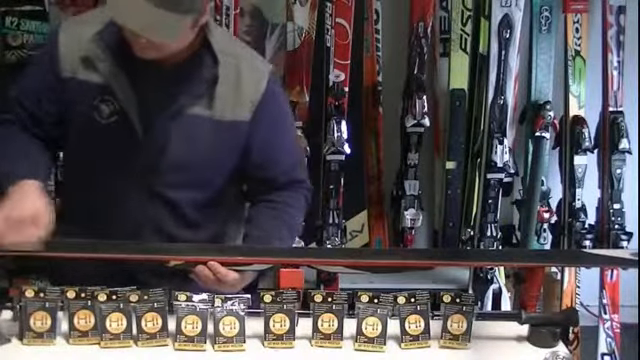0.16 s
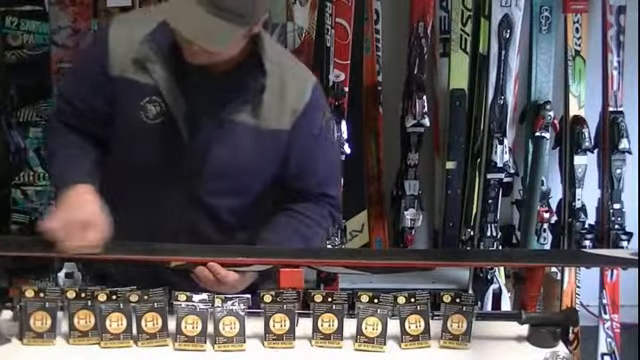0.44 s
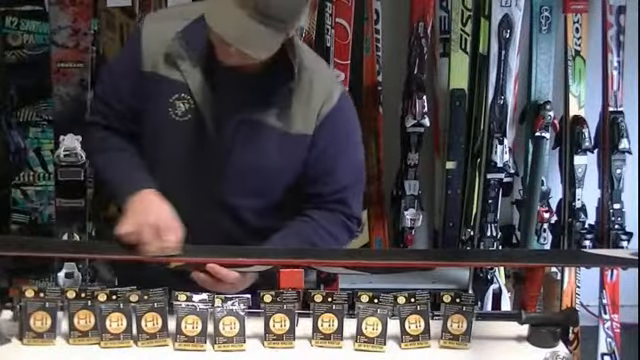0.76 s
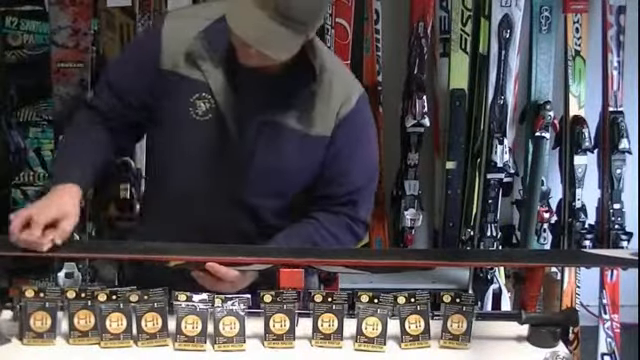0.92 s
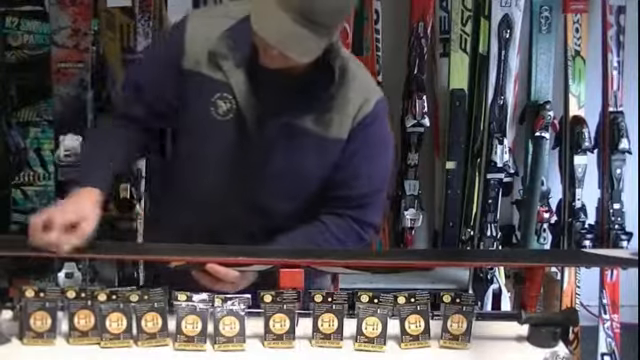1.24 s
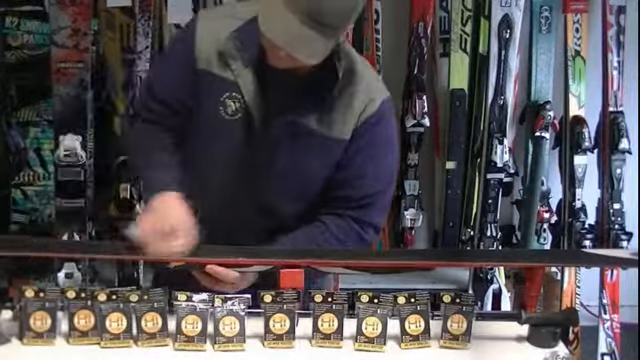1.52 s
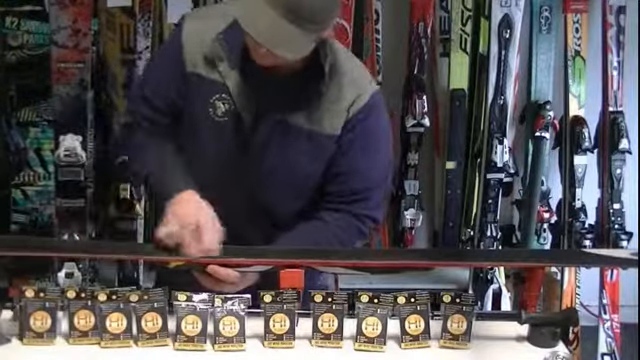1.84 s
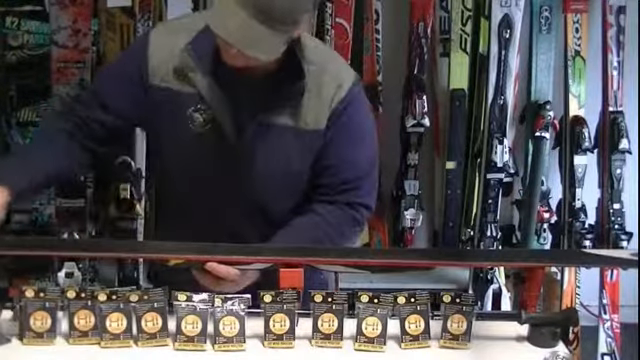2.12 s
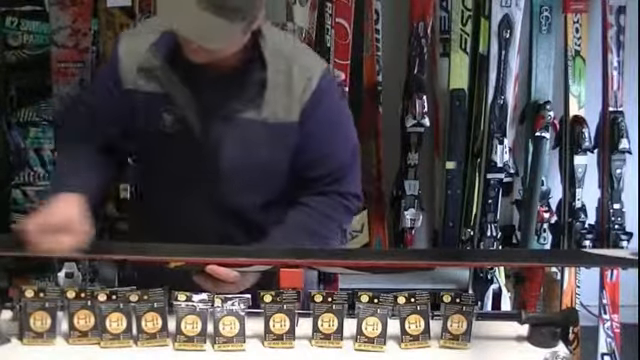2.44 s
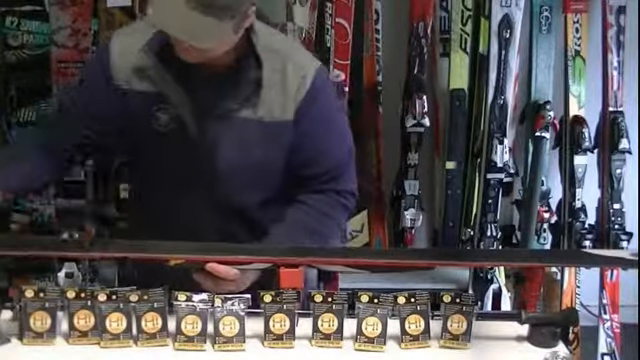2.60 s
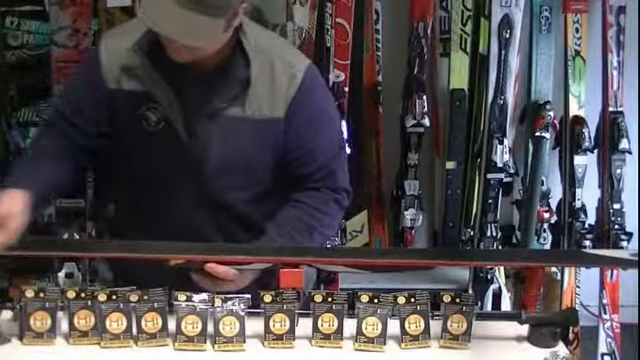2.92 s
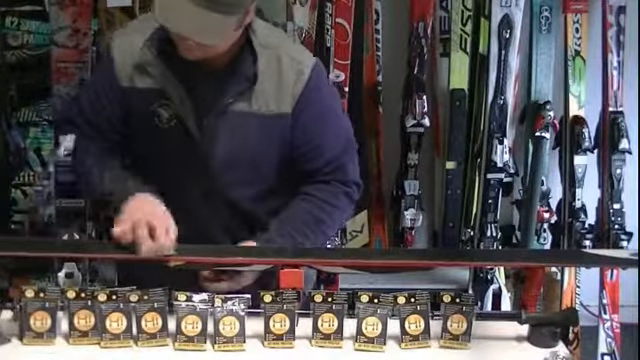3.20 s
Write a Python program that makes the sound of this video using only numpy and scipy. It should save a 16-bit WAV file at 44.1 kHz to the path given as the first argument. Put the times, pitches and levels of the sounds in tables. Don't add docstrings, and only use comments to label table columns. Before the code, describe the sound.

Wax block rubbed briskly back and forth along a ski base, hissing dry strokes in a small workshop

```python
import sys
import numpy as np
from scipy import signal
from scipy.fft import rfft, irfft, next_fast_len
from scipy.io import wavfile
from scipy.ndimage import uniform_filter1d

SR = 44100
rng = np.random.default_rng(int(sys.argv[2]) if len(sys.argv) > 2 else 0)


def file_out(sig):
    cols = np.atleast_2d(sig).T
    lim = np.clip(cols, -1, 1)
    pcm = np.round(lim * 32767).astype(np.int16)
    wavfile.write(sys.argv[1], SR, pcm)


def boost_factor(decibels):
    exponent = np.asarray(decibels, float) / 20
    return 10 ** exponent


N = 148176

# (frequency [Hz], level [dB])
HUM = [(25, -2), (55, -3.5), (110, -0.5), (160, 1), (235, 9.5), (260, 6.5), (315, 14.5), (420, 11)]
# (frequency [Hz], likeness [0-1])
HUM_SAME = [(25, .02), (60, .2), (125, 0.33), (250, 0.97), (500, 0.75)]
# (frequency [Hz], t60 [s])
ROOM_DECAY = [(300, 0.21), (1500, 0.18), (4000, .3), (8000, 0.18), (12000, 0.22)]
# (frequency [Hz], level [dB])
ROOM_SIDE = [(300, -18), (700, -14.5), (1500, -13), (3000, -9), (6000, -6.5), (12000, -8.5)]
# (frequency [Hz], left minus right [dB])
LEAN = [(60, 5), (110, -5), (190, 0), (350, -0.5), (630, -0.5), (1140, 0.0), (2060, 0.5), (3710, 0.5),
        (6690, 1.5), (12100, 0.5)]
# (starting turn [s], hiss level [dB], slope over the stroke [dB], speed-up [s], slow-down [s])
STROKES = [(-.12, -38.5, -13, .02, 0.032), (0.047, -43.5, 1, 0.02, 0.016),
           (0.223, -45.5, -3.5, 0.025, 0.017), (0.39, -43, -5, 0.025, 0.022), (0.576, -46, 5, 0.014, 0.023),
           (0.741, -45, -3.5, 0.023, 0.018), (.937, -47, -0.5, 0.024, 0.025),
           (1.103, -46.5, -0.5, 0.017, .02), (1.284, -46, 3.5, 0.018, 0.017),
           (1.455, -44.5, -1, 0.016, 0.018), (1.631, -46.5, 5, 0.019, 0.021),
           (1.804, -46, -1.5, 0.015, 0.028), (1.994, -44.5, 5.5, 0.029, 0.053),
           (2.335, -44, 0, 0.04, 0.029), (2.558, -50.5, -5, 0.01, 0.0018),
           (2.586, -44.5, 7.5, 0.0044, 0.037), (2.753, -44.5, -2, 0.027, .01),
           (2.953, -52, 6, 0.017, 0.0034), (2.995, -45, 8, 0.0038, 0.035), (3.154, -44, -5, 0.04, 0.053)]
# (ring level [dB], ring slope over the stroke [dB], low modes [dB], treble [dB])
GRIPS = [(-57, -15, -1, -1.5), (-54, -1, 0.5, -3), (-57.5, -2, 1, 1.6), (-54, -3, 2.2, -0.4),
         (-61.5, -7, 5.8, 2.4), (-51.5, -2.5, -1.3, 1.5), (-60, -8, 5, 5.5), (-52.5, 1, 1, 3.5),
         (-57, -4, -1, 1), (-52.5, -2.5, 0, -1.4), (-59, -6, 3.5, 1.3), (-54, -2, 1, -1),
         (-56, -6.5, -1, .1), (-52, 4, -3.5, -0.5), (-59, -3, 9, 6), (-55, -6, -3.5, 4.3),
         (-51.5, 0, -1.2, 2.4), (-55, 8, -0.5, 5), (-56, -5, 1.5, 4.7), (-54, -2, 1.5, 2.2)]
# (time [s], length [s], frequency [Hz], level [dB])
GRABS = [(0.42, 0.027, 1780, -46.5), (0.56, 0.022, 2100, -57), (0.77, 0.016, 2280, -49.5),
         (0.8, 0.033, 1900, -54), (0.94, 0.05, 2550, -58), (1.17, 0.1, 2440, -52),
         (1.62, 0.084, 840, -64.5), (1.88, 0.076, 800, -61.5), (2.19, 0.033, 1880, -51.5),
         (2.5, 0.031, 1650, -67), (2.6, 0.028, 3240, -58), (2.775, 0.035, 1760, -51),
         (2.816, 0.026, 1620, -54), (2.9, .04, 1390, -66), (3.034, .035, 1730, -60.5),
         (3.209, 0.04, 1600, -50.5), (3.3, 0.032, 1700, -52.5), (3.31, 0.046, 2380, -50.5),
         (3.06, 0.11, 5900, -53), (3.9, 0.042, 4400, -48.5), (2.2, .03, 7900, -44.5),
         (2.64, 0.11, 5250, -60), (0.435, 0.046, 5500, -58), (2.66, .1, 3100, -62), (0.8, 0.045, 5000, -67)]
# (frequency [Hz], width [Hz], level [dB])
SKI_MODES = [(515, 45, -8), (638, 120, -6.5), (780, 85, -3), (840, 33, -4), (941.5, 25, -7),
             (1135, 61, -5.5), (1630, 114, 0.5), (1733, 43, -1.5), (1843, 41, 0), (1938, 59, -3),
             (2173, 26, -3.5), (2375, 140, 0.5), (2865, 77, -2), (1406, 110, -5.5)]
# (frequency [Hz], level [dB])
HISS = [(150, -53), (440, -28), (520, -17.5), (1500, -11.5), (1700, -5.5), (4200, -7.5), (8000, -11),
        (12000, -13.5)]
# (frequency [Hz], width [Hz], level [dB])
BLOCK_HUMPS = [(5360, 540, -0.5), (7680, 230, -9.5), (11540, 410, -17.5)]

HUM_DB = -75
ROOM_MID_DB = -4
PLACES, PLACE_S = 12, 0.012
EDGE_HZ = 12052
LAST_TURN_S = 3.395
CREEP = 0.087
JUDDER_DB, JUDDER_S = 3.5, 0.0027
SLIPS_PER_S, SLIP_SPREAD_DB, RING_SPREAD_DB = 14000, 2, 1.5
CHATTER_DB, CHATTER_S = 0.5, 0.0027
RING_CHATTER_DB, RING_CHATTER_S = 4, 0.012
DULL_POWER, BRIGHT_POWER, RING_POWER = 0.37, 2.66, 0.23
SPLIT_HZ = 7500
LOW_MODES_HZ = 1400
GRAB_WIDTH = 0.074
PATCH_DB = 2.04


def evened(x):
    return x / np.sqrt(np.mean(x ** 2) + 1e-20)


def read(points, hz):
    f, value = np.transpose(points)
    return np.interp(np.log(hz + 1), np.log(f + 1), value)


def colour(x, gain):
    return irfft(rfft(x) * gain(np.fft.rfftfreq(N, 1 / SR)), N)


def resonate(x, hz, width):
    r = np.exp(-np.pi * width / SR)
    pole = r * np.exp(2j * np.pi * hz / SR)
    return 2 * signal.lfilter([1 - r], [1, -pole], x).real


def wobble(depth_db, time_s):
    n = max(round(time_s * SR), 1)
    wander = uniform_filter1d(uniform_filter1d(rng.standard_normal(N), n), n)
    return boost_factor(2 * depth_db * np.tanh(evened(wander) / 2))


def hum():
    a, b = rng.standard_normal((2, N))

    def same(f):
        return np.clip(read(HUM_SAME, f), 0, 1)

    other = colour(a, same) + colour(b, lambda f: np.sqrt(1 - same(f) ** 2))
    murmur = colour(np.array([a, other]), lambda f: boost_factor(read(HUM, f)) / (1 + (f / 450) ** 12))
    return boost_factor(HUM_DB) * evened(murmur)


def room(x):
    taps = np.zeros((2 * PLACES, SR // 2))
    grid = np.arange(200, SR // 2 - 20, 20)
    at = grid + rng.integers(0, 20, (2 * PLACES, (SR // 2 - 201) // 20))
    np.put_along_axis(taps, at, rng.choice([-1., 1.], at.shape), 1)
    hz, t, z = signal.stft(taps, SR, nperseg=256)
    z = z * boost_factor(-60 * t / read(ROOM_DECAY, hz)[:, None])
    z = z / np.linalg.norm(z, axis=(0, 2), keepdims=True)
    tail = signal.istft(z, SR, nperseg=256)[1]
    tail = tail.reshape(2, PLACES, -1) * np.sqrt(2 * PLACES) / np.linalg.norm(tail)
    away = (np.arange(N) / SR / PLACE_S - np.arange(PLACES)[:, None]) % PLACES - 1
    share = np.cos(np.pi / 2 * np.clip(away, -1, 1))
    size = next_fast_len(N + SR)
    mid, side = irfft((rfft(share * x, size) * rfft(tail, size)).sum(1), size)[:, :N]
    mid = boost_factor(ROOM_MID_DB) * mid
    side = colour(side, lambda f: boost_factor(read(ROOM_SIDE, f)))
    return np.array([mid + side, mid - side])


def motion():
    start, hiss_db, hiss_slope, up_s, down_s = np.transpose(STROKES)
    ring_db, ring_slope, low_db, treble_db = np.transpose(GRIPS)
    t = np.arange(N) / SR
    end = np.append(start[1:], LAST_TURN_S)
    k = np.searchsorted(start, t) - 1
    since = t - start[k]
    left = np.maximum(end[k] - t, 0)
    along = since / (end - start)[k] - 0.5
    speed = np.tanh(since / up_s[k]) ** 2 * np.tanh(left / down_s[k]) ** 2
    speed = CREEP + (1 - CREEP) * speed
    speed = speed ** wobble(JUDDER_DB, JUDDER_S)
    press_db = hiss_db[k] + hiss_slope[k] * along
    ringing_db = ring_db[k] + ring_slope[k] * along
    levels_db = np.array([press_db, treble_db[k], ringing_db, low_db[k]])
    return speed, *boost_factor(uniform_filter1d(levels_db, size=600))


def slips(spread_db):
    hit = rng.random(N) < SLIPS_PER_S / SR
    sign = rng.choice([-1., 1.], N)
    size = rng.exponential(1, N)
    return evened(hit * sign * boost_factor(spread_db * np.minimum(size, 5)))


def grabs():
    t, out = np.arange(N) / SR, np.zeros(N)
    x = slips(RING_SPREAD_DB)
    for s, length, hz, db in GRABS:
        part = slice(max(round((s - 0.15) * SR), 0), round((s + 0.15) * SR))
        width = GRAB_WIDTH * hz
        band = resonate(resonate(x[part], hz, width), hz, width)
        swell = np.exp(-0.5 * (2 * (t[part] - s) / length) ** 2)
        loudness = np.sqrt((band ** 2 * swell).sum() / swell.sum())
        out[part] += boost_factor(db) * swell * band / loudness
    return out


def ring(speed, press, low):
    drive = slips(RING_SPREAD_DB) * speed ** RING_POWER * press
    modes = 0
    for hz, width, db in SKI_MODES:
        grip = low if hz < LOW_MODES_HZ else 1
        caught = drive * grip * wobble(RING_CHATTER_DB, RING_CHATTER_S)
        mode = resonate(resonate(caught, hz, width * 1.23), hz, width * 1.23)
        modes = modes + boost_factor(db) / np.sqrt(np.pi * width / SR) * mode
    return modes * boost_factor(-7)


def patchy(x):
    z = signal.stft(x, nperseg=256, noverlap=192)[2]
    field = uniform_filter1d(rng.standard_normal(z.shape), size=6, axis=0)
    field = evened(uniform_filter1d(field, size=10, axis=1))
    z = z * boost_factor(2 * PATCH_DB * np.tanh(field / 2))
    return signal.istft(z, nperseg=256, noverlap=192)[1][:N]


def hiss(speed, press, treble):
    x = patchy(slips(SLIP_SPREAD_DB) * wobble(CHATTER_DB, CHATTER_S))
    x = colour(x, lambda f: boost_factor(read(HISS, f)))
    humps = sum(boost_factor(db) * resonate(x, hz, width) for hz, width, db in BLOCK_HUMPS)
    x = evened(x + humps)
    dull = colour(x, lambda f: 1 / (1 + (f / SPLIT_HZ) ** 2))
    bright = (x - dull) * treble
    return press * (dull * speed ** DULL_POWER + bright * speed ** BRIGHT_POWER)


def scene():
    speed, press, treble, ringing, low = motion()
    rub = hiss(speed, press, treble) + ring(speed, ringing, low) + grabs()
    return rub + room(rub) + hum()


def low_pass(x):
    return signal.sosfilt(signal.butter(12, 12660, fs=SR, output="sos"), x)


def record(dry):
    def port_gain(f):
        balance = boost_factor(np.outer([0.5, -0.5], read(LEAN, f)))
        return balance / (1 + (f / EDGE_HZ) ** 200)

    ports = colour(dry, port_gain)
    return low_pass(ports)


dry = scene()
out = record(dry)
file_out(out)
```